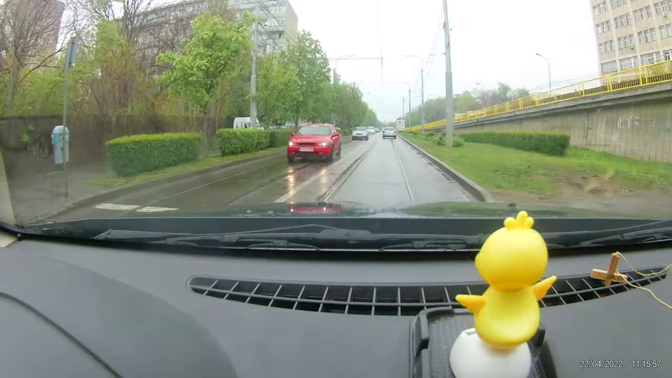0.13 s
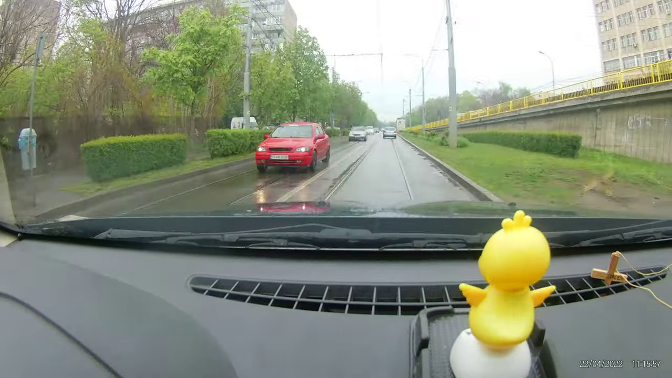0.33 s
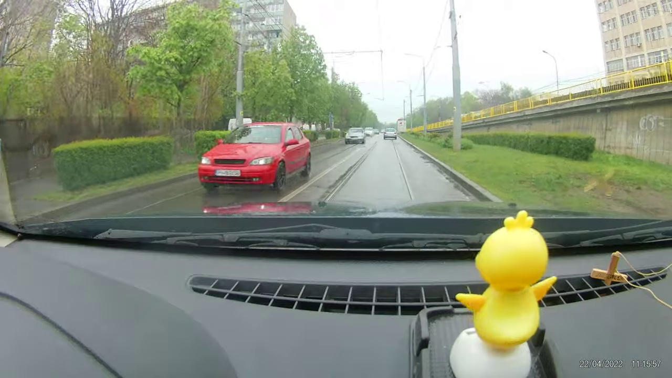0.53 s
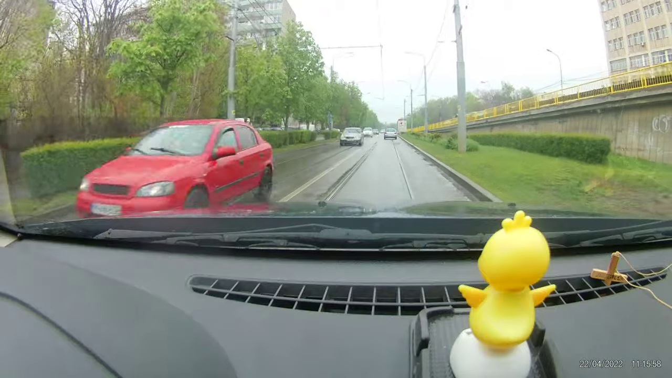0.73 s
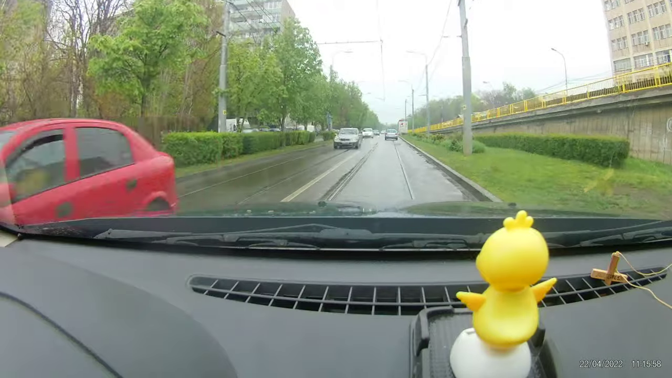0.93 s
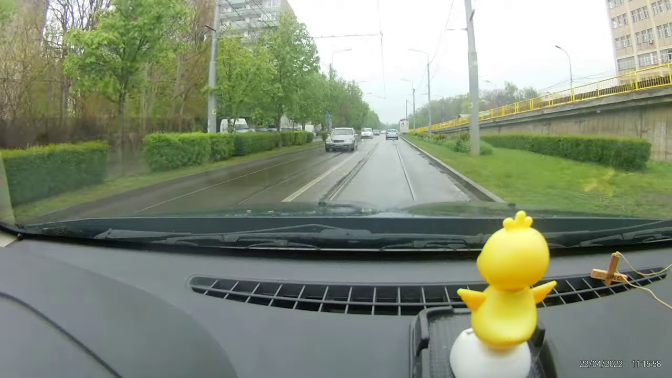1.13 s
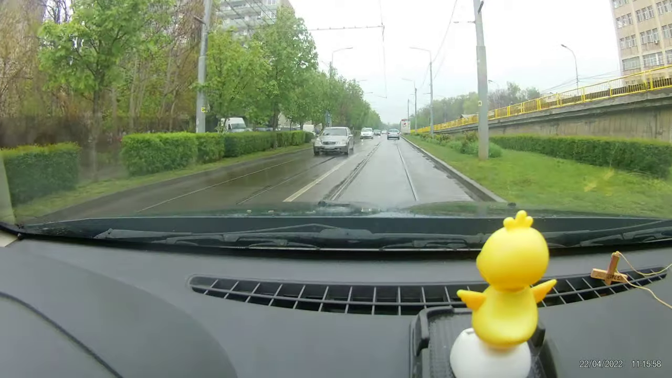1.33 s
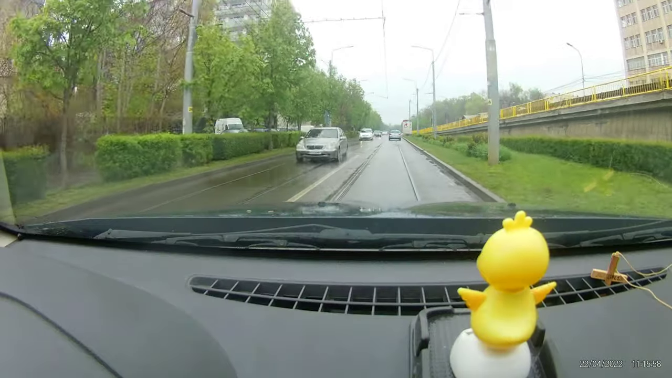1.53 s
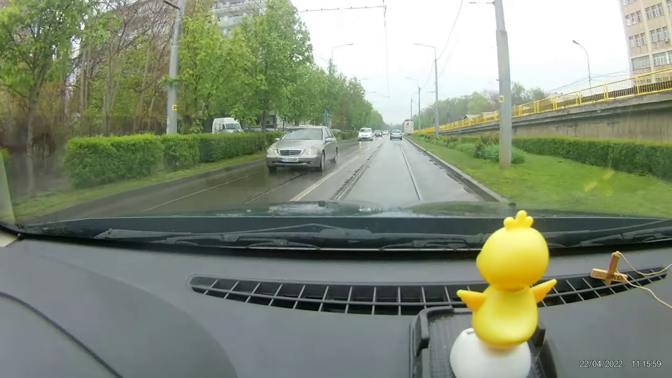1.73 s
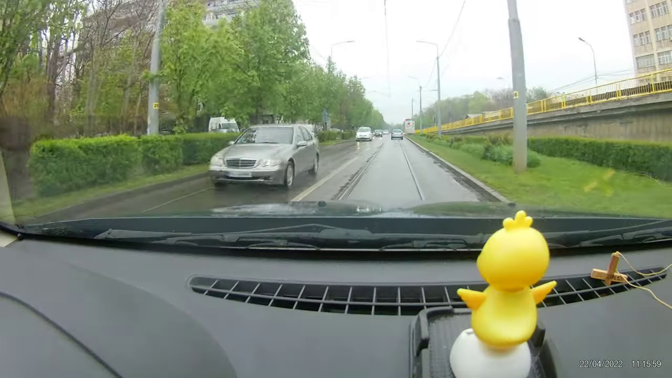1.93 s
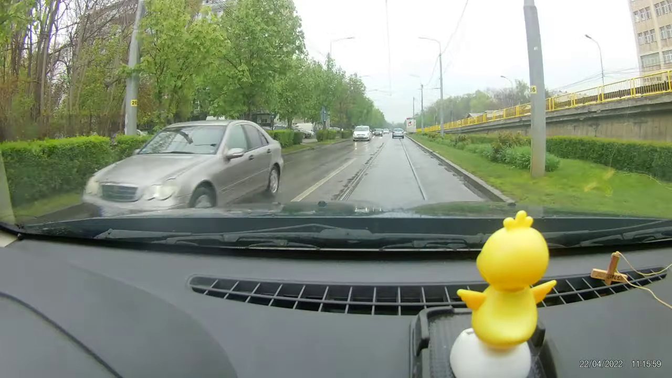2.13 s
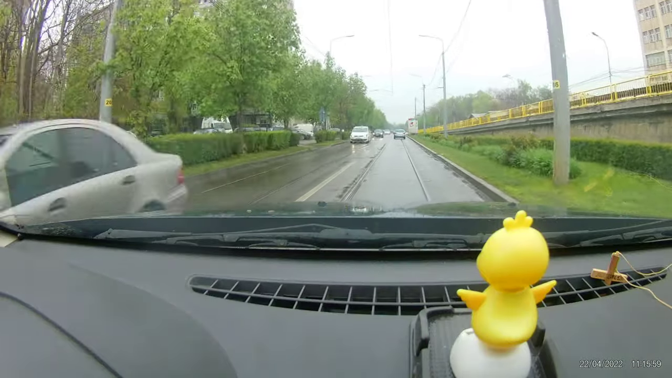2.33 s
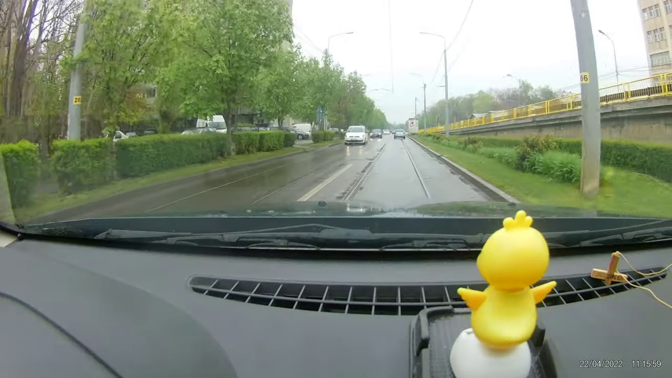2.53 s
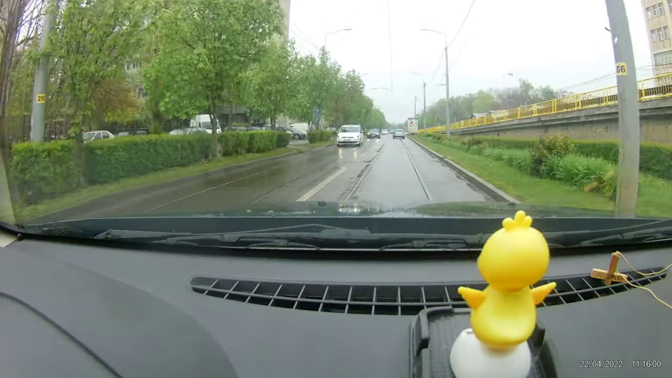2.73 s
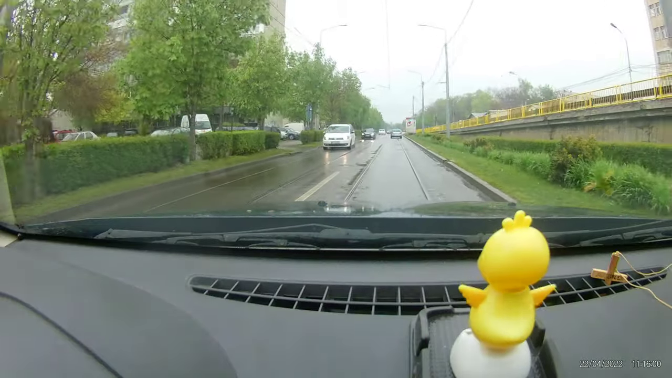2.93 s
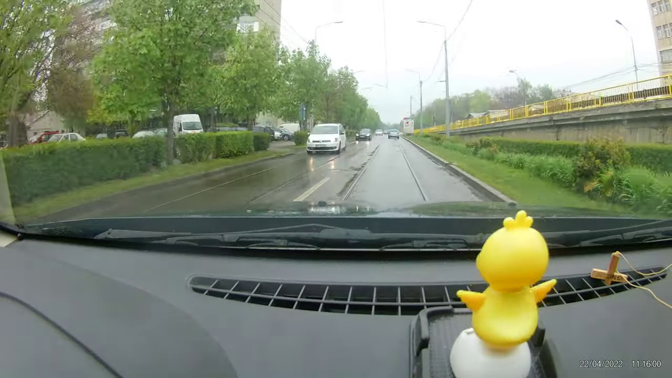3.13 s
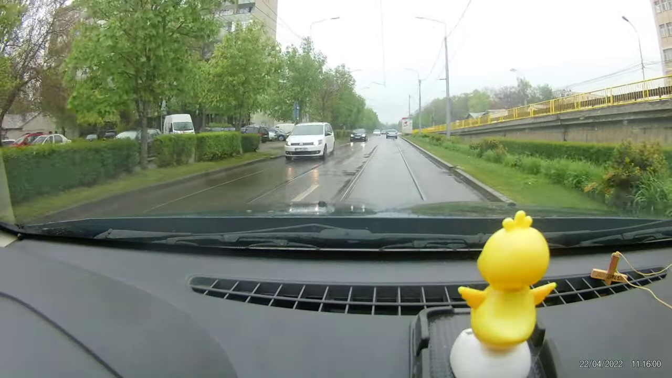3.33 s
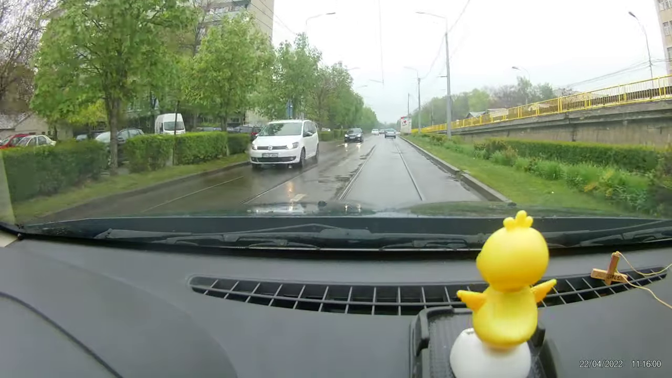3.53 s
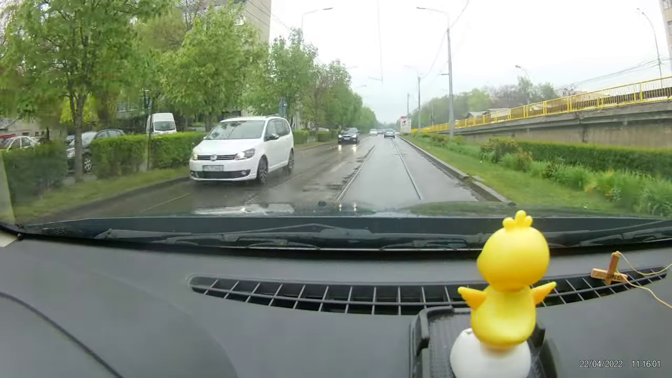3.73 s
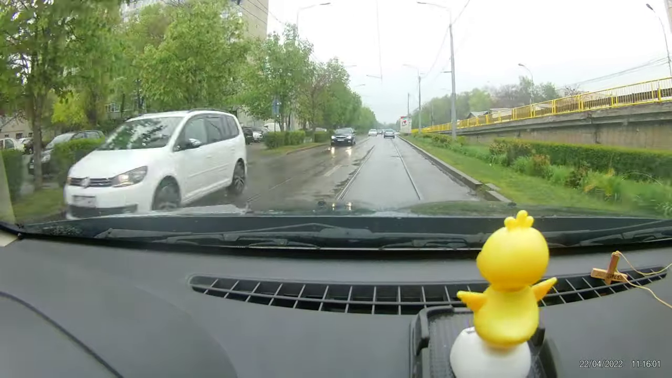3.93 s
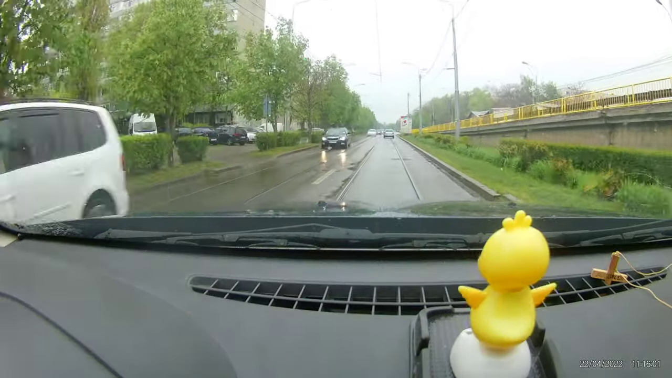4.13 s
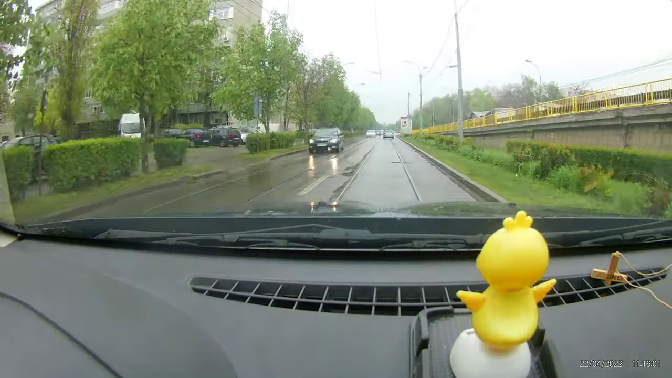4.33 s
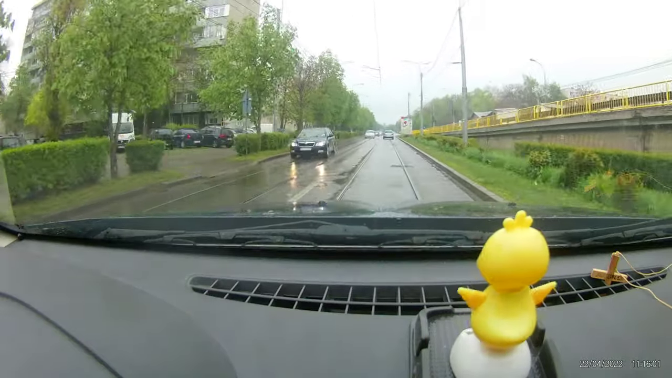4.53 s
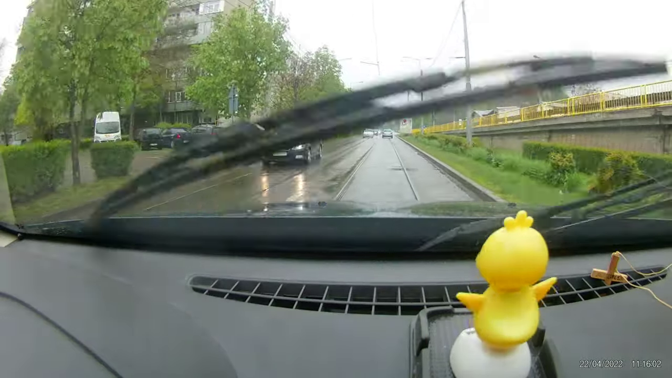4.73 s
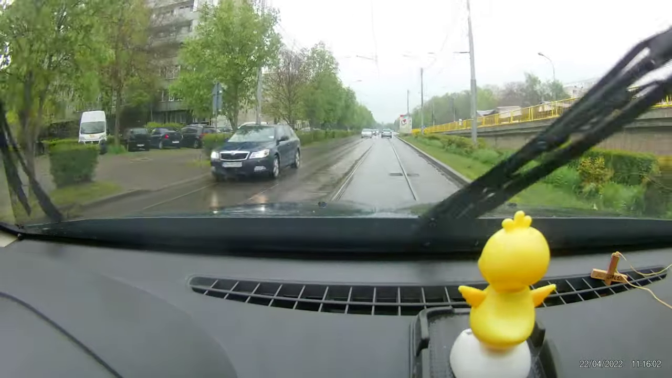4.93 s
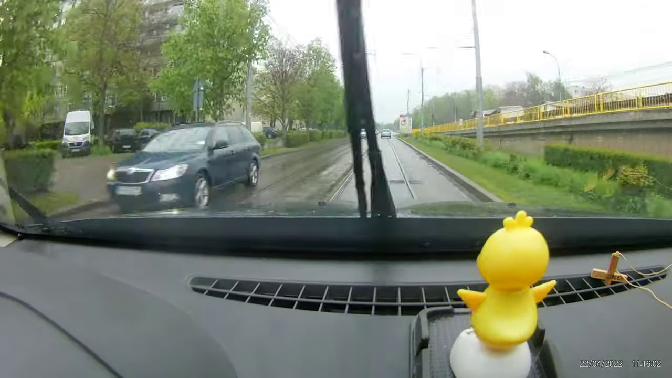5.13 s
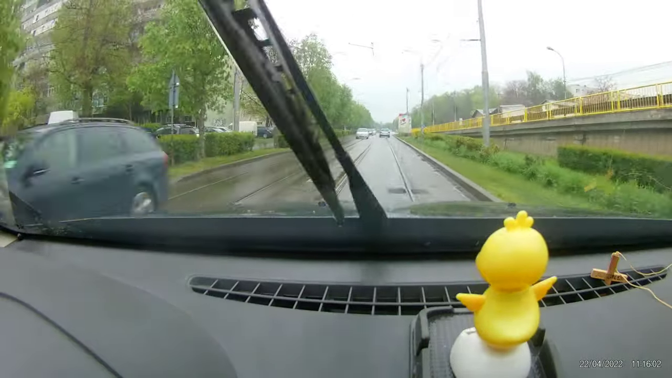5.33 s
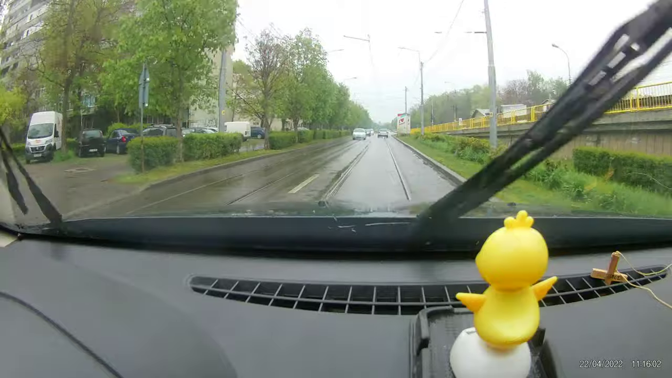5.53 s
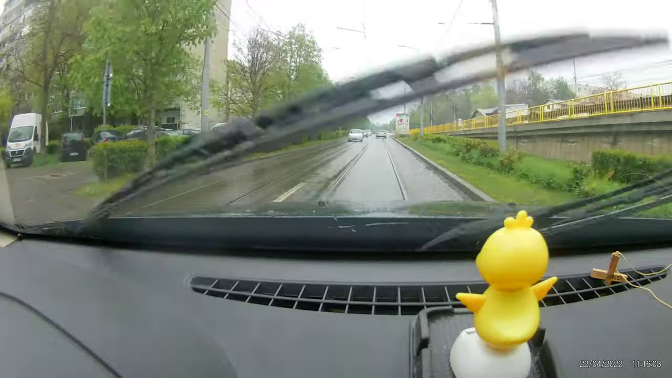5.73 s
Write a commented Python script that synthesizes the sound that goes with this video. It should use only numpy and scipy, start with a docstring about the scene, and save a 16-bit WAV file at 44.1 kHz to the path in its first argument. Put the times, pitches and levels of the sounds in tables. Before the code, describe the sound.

Steady bassy cabin drone with tyre hum and roar, heard from a small microphone on the dashboard. Four wet passing swishes rise and fall at intervals. The engine rises gently in pitch until the throttle closes, leaving stronger road noise, low bumps and light ticks. Near the end a wiper blade drags, chatters and squeaks, then knocks over; rumble continues in the small, dry cabin.

```python
"""A car engine booms low on a wet street; the boom climbs, then fades as the throttle closes. The body
bounces over bumps, tyres hum and roar, oncoming cars swish past in their spray. Trim ticks; a wiper blade
drags, squeaks and chatters at the top of its sweep, then flips over with a knock. Engine and squeak are
sums of overtones, road and spray coloured noise, ticks and knocks ringing modes.
A small dashboard microphone dulls the treble and adds faint hiss."""
import sys
import numpy as np
from scipy import signal
from scipy.fft import rfft, irfft, next_fast_len
from scipy.io import wavfile
from scipy.ndimage import uniform_filter1d, map_coordinates

SR = 44100
rng = np.random.default_rng(int(sys.argv[2]) if len(sys.argv) > 2 else 0)


def generate_wav(sig):
    """Save sig (samples, or channels by samples) to the path in sys.argv[1] as 16-bit PCM at SR."""
    pcm = np.round(np.clip(np.atleast_2d(sig).T, -1, 1) * 32767).astype(np.int16)
    wavfile.write(sys.argv[1], SR, pcm)


def field_ratio(decibels):
    """Amplitude ratio for a level in dB (20 dB per decade); scalars and array-likes work."""
    return 10 ** (np.asarray(decibels, dtype=float) / 20)


N = 260190  # length in samples

# engine at 1, 2 and 3 times the firing rate: level/dB before the cabin's boom
ORDER_LEVELS = [-24, -30.5, -29]
# air modes of the cabin that the engine sweeps through: f/Hz, width/Hz before squaring, relative level/dB
CABIN_MODES = [(45.5, 3.8, 0), (51.6, 5.5, -5.5), (91, 9, -12), (161.5, 9, -15)]
# coarseness of the asphalt, as the usual level of the floor-pan drone: t/s, level/dB
ASPHALT = [(0, -40.5), (1.2, -39), (1.8, -39.5), (2.5, -38), (3.0, -39.5), (3.8, -37.5), (4.3, -34.5),
           (5.0, -35), (5.9, -32.5)]
# colours of the road noise, as body bounce, floor-pan drone and tyre roar: f/Hz, relative level/dB
BOUNCE_COLOUR = [(12, -16), (20, 3), (30, 8), (38, 6), (50, -14.5), (62, -15.5), (80, -50.5)]
DRONE_COLOUR = [(34, -33.5), (58, -2), (74, -7), (103, -8), (210, -16), (260, -27), (340, -41), (570, -120)]
ROAR_COLOUR = [(140, -27.5), (230, -2), (337, -7), (430, -5.5), (466, -9.5), (489, -8.5), (514, -3.5),
               (599, -9), (809, -16.5), (1230, -20.5), (1600, -40.5), (2080, -70.5), (3520, -120)]
# hums of floor panels, tyre cavity and tread: f/Hz, width/Hz before squaring, usual level/dB
ROAD_HUMS = [(101.2, 2.6, -53), (131.6, 10, -50.5), (208.8, 11, -46), (510.7, 7.1, -57)]
# oncoming cars: t/s when closest, tyre rush level/dB, spray level/dB
ONCOMING = [(1.2, -42.5, -65.5), (2.56, -44.5, -70.5), (4.43, -48, -65.5), (5.67, -46.5, -66)]
# colours of wet tyre rush, spray, airflow and microphone hiss: f/Hz, relative level/dB
RUSH_COLOUR = [(400, -21.5), (600, -5.5), (705, 2), (1010, 2.5), (1110, 0.5), (1200, -4), (1380, -7.5),
               (1510, -15), (2030, -16.5), (2250, -22.5), (2700, -26.5), (3000, -38), (3600, -35.5)]
SPRAY_COLOUR = [(2000, -4), (2800, -6.5), (3200, -3), (3700, 0), (3950, -1.5), (4300, 0), (5000, -3),
                (5350, -3.5), (5800, -1), (6500, -6.5), (7000, -5), (7600, -14.5), (8500, -46)]
AIR_COLOUR = [(1200, -13.5), (1600, 2.5), (2000, -5.5), (2600, -3), (2900, -11), (3500, -12), (3800, -8.5),
              (4600, -21), (6000, -19.5), (7000, -22.5), (8000, -41)]
HISS_COLOUR = [(5000, -20), (7000, -2), (8000, -3), (11000, -3), (13000, -2), (15000, 0), (15600, 2),
               (17000, 2)]
# dull knocks through dashboard and wiper linkage; the last, loud group is the blade flipping over:
# t/s, relative level/dB, contact time/s
KNOCK_EVENTS = [(0.648, -36, 0.00027), (1.76, -25, 0.0011), (4.586, -31.5, 0.00074), (4.6, -26.5, 0.00093),
                (5.373, -24.5, 0.00044), (5.379, -22, 0.0003), (5.3848, -11.5, 0.0006),
                (5.391, -19.5, 0.0013), (5.396, -20.5, 0.00063), (5.399, -31.5, 0.0012),
                (5.41, -12.5, 0.0013)]
# ringing modes of the dashboard: f/Hz, relative level/dB, time to fade by 60 dB/s
DASH_MODES = [(99, 5, 0.15), (144.4, 10.5, 0.14), (183.7, 5.5, 0.21), (297, -13, 0.17), (375, 1, 0.18),
              (435, -25, 0.11), (582, 14.5, 0.14), (722, 14, 0.039), (948, 23, 0.014), (1270, 14.5, 0.018),
              (1830, 4, .015), (2600, 0, .012), (3700, -11, 0.0083)]
# ticks of small plastic parts: t/s, relative level/dB of the low modes, and of the high modes
TICK_EVENTS = [(3.2894, -68, -75), (3.969, -61, -57), (3.9914, -45.5, -46.5), (4.128, -62, -68),
               (4.538, -49, -55), (4.639, -42, -52), (4.7057, -54, -74), (4.7386, -48, -67),
               (4.783, -47, -56), (4.9065, -47, -51)]
# ringing modes of the trim: f/Hz, relative level/dB, time to fade by 60 dB/s
TRIM_MODES = [(1450, -3, .01), (1780, 0, .012), (2250, 0, .009), (2650, -6, .006), (3700, -4, .007),
              (4150, 1, .007), (4650, 0, .007), (5600, -5, .006), (6200, -11, .005)]
# sharp bumps that rock the body: t/s, length/s, level/dB before smoothing, f/Hz
BUMP_EVENTS = [(3.948, 0.15, -14, 30.3), (4.326, 0.069, -16.5, 48), (4.412, 0.073, -18, 29.8),
               (4.477, 0.069, -19, 46.3), (4.607, 0.13, -26, 30), (5.296, 0.077, -18.5, 33.7),
               (5.645, 0.17, -19.5, 29.3)]
# each grip of the rubber on the glass: t/s, length/s, relative level/dB, slip rate f/Hz as it catches
RUBBER_GRIPS = [(4.557, .04, -36, 428), (5.087, .025, -21, 435), (5.112, .026, -21, 442),
                (5.133, .026, -19, 402), (5.158, .03, -20.5, 383), (5.183, .024, -17.5, 358),
                (5.197, .03, -14.5, 342), (5.222, .028, -17.5, 372), (5.246, .024, -16, 344),
                (5.263, .028, -17, 336)]
# resonances of windscreen and wiper arm: f/Hz, width/Hz, relative level/dB
GLASS_MODES = [(239.7, 9, 24), (331, 16, 2), (390, 90, -20), (537, 38, 8), (663, 14, 0.5), (850, 53, -20.5),
               (903, 150, -5), (1160, 29, 4.5), (1407, 50, -3), (1670, 12, -9.5)]


def unit(x):
    """Scaled to rms 1."""
    return x / np.sqrt(np.mean(x ** 2) + 1e-20)


def curves(rows):
    """One value per sample for each column after the time."""
    s, *cols = np.transpose(rows)
    return [np.interp(np.arange(N) / SR, s, c) for c in cols]


def wobble(rate):
    """A smooth random curve through `rate` random points a second."""
    return map_coordinates(rng.standard_normal(int(N * rate / SR) + 4), [np.arange(N) * rate / SR])


def filtered(x, response):
    """Multiplies the spectrum of x by a response that depends on frequency."""
    m = next_fast_len(N + SR // 2)
    return irfft(rfft(x, m) * response(np.fft.rfftfreq(m, 1 / SR)), m)[:N]


def resonances(modes):
    """Response of bodies that ring at a few frequencies; neighbours have opposite sign."""
    def response(f):
        return sum((-1) ** k * field_ratio(db) * 1j * f * width / (hz * hz - f * f + 1j * f * width)
                   for k, (hz, width, db) in enumerate(modes))
    return response


def noise(colour, patchy_db):
    """Coloured noise of rms 1 with patches of random gain; silent outside the colour's range."""
    grid = signal.stft(rng.standard_normal(N), nperseg=512)[2]
    patches = uniform_filter1d(rng.standard_normal(grid.shape), 5, 0)  # blur over frequency
    patches = uniform_filter1d(patches, 12, 1)  # blur over time
    patchy = signal.istft(grid * field_ratio(patchy_db * unit(patches)), nperseg=512)[1][:N]
    hz, db = np.transpose(colour)

    def response(f):
        gain = field_ratio(np.interp(np.log(f + 1), np.log(hz + 1), db))
        return gain * (f > hz[0]) * (f < hz[-1])
    return unit(filtered(patchy, response))


def add(track, s, sound):
    """Mixes a sound into the track at time s."""
    part = track[round(s * SR):][:len(sound)]
    part += sound[:len(part)]


def ring(modes, spread_db):
    """One blow: every mode starts at a new random strength and fades."""
    t = np.arange(SR // 3) / SR
    return sum(field_ratio(db + rng.normal(0, spread_db) - 60 * t / t60) * np.sin(2 * np.pi * hz * t)
               for hz, db, t60 in modes)


def engine():
    """The firing rate climbs; each order swells and dips as it sweeps through the cabin's air modes."""
    start_hz, climb_hz_per_s = 42.33, 3.3
    lift_s, fade_db_per_s = 4.54, 67  # the throttle closes: the climb stops and the boom fades
    t = np.arange(N) / SR
    firing_hz = start_hz + climb_hz_per_s * np.minimum(t, lift_s)
    turn = 2 * np.pi * np.cumsum(firing_hz) / SR
    lift_db = -fade_db_per_s * np.maximum(t - lift_s, 0)

    def boom(f):
        return np.abs(sum(field_ratio(db) * (f * width / (hz * hz - f * f + 1j * f * width)) ** 2
                          for hz, width, db in CABIN_MODES))
    out = np.zeros(N)
    for order, db in enumerate(ORDER_LEVELS, start=1):
        level = np.sqrt(2) * boom(order * firing_hz) * field_ratio(db + lift_db + 1.6 * wobble(6.7))
        out += level * np.sin(order * turn + 0.051 * wobble(16))
    return out


def road():
    """Uneven asphalt shakes body and floor pan; the tyres roar and hum in narrow bands."""
    drone_db, = curves(ASPHALT)
    usual_db = drone_db.mean()
    roar_db = usual_db - 7 + 0.73 * (drone_db - usual_db)  # the roar swings less than the drone
    grain = wobble(14)  # coarse patches raise drone and roar together
    bounce = field_ratio(drone_db + 4 + wobble(3)) * noise(BOUNCE_COLOUR, patchy_db=2.5)
    drone = field_ratio(drone_db + 0.5 * grain) * noise(DRONE_COLOUR, patchy_db=0.05)
    roar = field_ratio(roar_db + 0.5 * grain) * noise(ROAR_COLOUR, patchy_db=1.04)
    hum = np.zeros(N)
    for hz, width, db in ROAD_HUMS:
        mode = resonances([(hz, width, 0)])
        band = filtered(rng.standard_normal(N), lambda f: mode(f) ** 2)
        hum += field_ratio(db + 1.8 * wobble(1.7)) * unit(band)
    return bounce + drone + hum + roar


def passing():
    """Wet tyres rush and throw spray: this car's own steadily, oncoming ones swelling with nearness."""
    near_s, away_s = 0.22, 0.14  # time for the rush to change by about 4 dB, coming and going
    hold_s, rise_s, hang_s = 0.08, 0.08, 0.2  # spray arrives abruptly and hangs behind the car
    t = np.arange(N) / SR
    road_db, = curves(ASPHALT)
    rush_power = field_ratio(road_db - 15.5) ** 2  # this car's own, relative to the drone
    spray_power = field_ratio(road_db - 42) ** 2
    for s, rush_db, spray_db in ONCOMING:
        distance = (t - s) / np.where(t < s, near_s, away_s)
        rush_power += field_ratio(rush_db) ** 2 / (1 + distance ** 2) ** 1.42
        off = np.maximum(np.abs(t - s) - hold_s, 0) / np.where(t < s, rise_s, hang_s)
        spray_power += field_ratio(spray_db) ** 2 / (1 + off ** 2)
    rush = np.sqrt(rush_power) * field_ratio(0.8 * wobble(12)) * noise(RUSH_COLOUR, patchy_db=1.6)
    spray = np.sqrt(spray_power) * field_ratio(1.1 * wobble(14)) * noise(SPRAY_COLOUR, patchy_db=0.6)
    return rush + spray


def airflow():
    """Air streams steadily over the windscreen and through the vents."""
    return field_ratio(-69.5) * noise(AIR_COLOUR, patchy_db=0.5)


def knocks():
    """Each contact pushes, cracks and rings the dashboard; a longer, softer one wakes less treble."""
    out, t = np.zeros(N), np.arange(SR // 20) / SR
    for s, db, contact in KNOCK_EVENTS:
        push = np.hanning(max(round(2 * contact * SR), 4))
        ringing = signal.fftconvolve(ring(DASH_MODES, spread_db=2.5), push / push.sum())
        add(out, s, field_ratio(db - 21) * ringing)
        give = np.concatenate([push, -0.6 * push])  # the panel gives, then springs back
        add(out, s, field_ratio(db - 7) * give)
        dull_noise = uniform_filter1d(uniform_filter1d(rng.standard_normal(len(t)), 14), 6)
        crack = dull_noise * field_ratio(-60 * t / 0.045)
        add(out, s, field_ratio(db - 15) * 0.0007 / contact * crack)
    return out


def ticks():
    """Small plastic parts tick: low and high modes in their own balance, rattling for a few ms."""
    out, t = np.zeros(N), np.arange(260) / SR
    for s, low_db, high_db in TICK_EVENTS:
        modes = [(hz, db - 3.5 + (high_db if hz > 3000 else low_db), t60) for hz, db, t60 in TRIM_MODES]
        tick = ring(modes, spread_db=2.5)
        rattle = rng.standard_normal(len(t)) * field_ratio(-60 * t / 0.012)
        add(out, s, signal.fftconvolve(tick, rattle / np.linalg.norm(rattle))[:len(tick)])
    return out


def bumps():
    """A wheel rides over an edge; the body swings up for a few cycles and the dampers catch it."""
    out = np.zeros(N)
    for s, length, db, hz in BUMP_EVENTS:
        t = np.arange(round(length * SR)) / SR
        swell = np.sin(np.pi * t / length) ** 0.74
        add(out, s, field_ratio(db) * swell * np.sin(2 * np.pi * hz * t))
    return filtered(out, lambda f: 1 / (1 + (f / 90) ** 4))


def squeak():
    """The rubber sticks and slips at a falling rate, in short grips, ever rougher, and drives the glass."""
    sag_hz_per_s, slowest_hz = 750, 331  # the slip rate sinks within each grip
    drag_from_s, drag_s = 5.085, 0.158  # end of the upward sweep: the rubber drags ever harder
    rate, t = np.zeros(N), np.arange(N) / SR
    for s, _, _, hz in RUBBER_GRIPS:
        rate = np.where(t >= s, np.maximum(hz - sag_hz_per_s * (t - s), slowest_hz), rate)
    drag = np.clip((t - drag_from_s) / drag_s, 0, 1) ** 1.7
    # each from its fresh value to its value at full drag
    rough = 0.08 + (0.42 - 0.08) * drag
    every_other = 0.05 + (0.5 - 0.05) * drag
    sharp = 0.42 + (0.72 - 0.42) * drag
    turn = 2 * np.pi * np.cumsum(rate * (1 + 0.2 * rough * wobble(900))) / SR
    # each overtone is sharp times the one below
    saw = np.sin(turn) / (1 - 2 * sharp * np.cos(turn) + sharp ** 2)
    grit = rough * rng.standard_normal(N) * (1 + 0.43 * np.cos(turn))  # the rubber scrapes while it slides
    swell = np.zeros(N)
    for s, length, db, _ in RUBBER_GRIPS:
        u = np.linspace(0, 1, round(length * SR))
        add(swell, s, np.sqrt(2) * field_ratio(db) * np.sin(np.pi * u ** 0.6) ** 0.8)
    swell = swell * (1 + every_other * np.cos(turn / 2))  # strong and weak slips alternate
    glass = resonances(GLASS_MODES)

    def glass_and_arm(f):
        less_treble = 1 / (1 + 1j * f / 1100) ** 3
        less_bass = ((1j * f / 230) / (1 + 1j * f / 230)) ** 3
        return (0.78 + field_ratio(2.5) * glass(f)) * less_treble * less_bass
    body = filtered(swell * (saw + 5 * uniform_filter1d(grit, 18)), glass_and_arm)
    scrape = filtered(swell * grit, resonances([(2160, 410, -26), (3900, 600, -55), (5600, 1500, -48)]))
    return body + scrape


def cabin(x, wet_db, t60):
    """Glass, roof and seats answer at once with a short dense tail."""
    t = np.arange(SR // 8) / SR
    tail = rng.standard_normal(len(t)) * field_ratio(-60 * t / t60) * (t > 0.001)
    return x + field_ratio(wet_db) * signal.fftconvolve(x, tail / np.linalg.norm(tail))[:N]


def scene():
    """Everything heard at the dashboard."""
    near = cabin(knocks(), wet_db=-1.5, t60=0.072)
    near += cabin(ticks(), wet_db=2.5, t60=0.024)
    near += cabin(squeak(), wet_db=-8, t60=0.043)
    return (engine() + road() + passing() + airflow() + bumps() + near)[None]


def top_cut(x):
    """Nothing passes above the cut-off."""
    return signal.sosfilt(signal.butter(12, 15720, fs=SR, output="sos"), x)


def record(dry):
    """The microphone loses the top treble and adds its own hiss."""
    dull = filtered(dry[0], lambda f: 1 / (1 + (f / 7200) ** 16))
    hiss = field_ratio(-81) * noise(HISS_COLOUR, patchy_db=0)
    return top_cut((dull + hiss)[None])


dry = scene()
out = record(dry)
generate_wav(out)
```